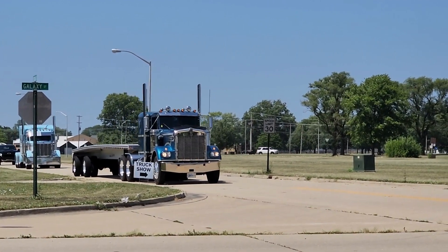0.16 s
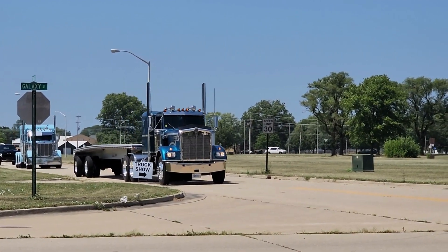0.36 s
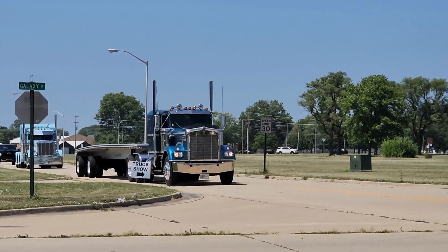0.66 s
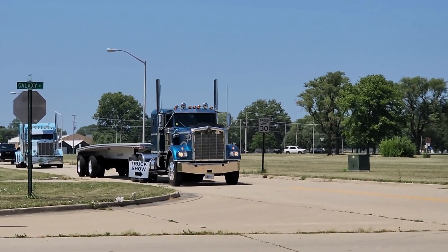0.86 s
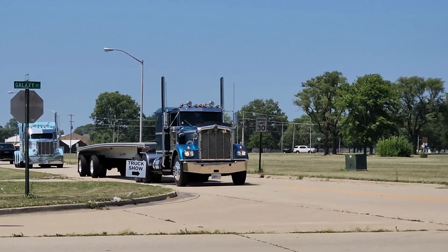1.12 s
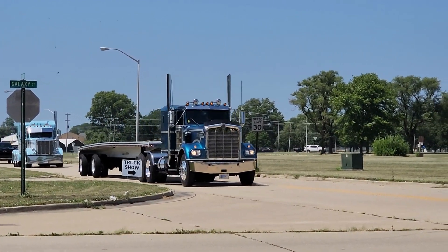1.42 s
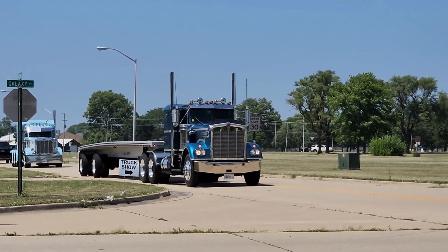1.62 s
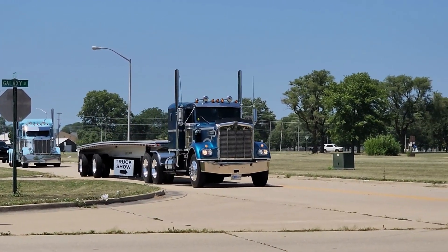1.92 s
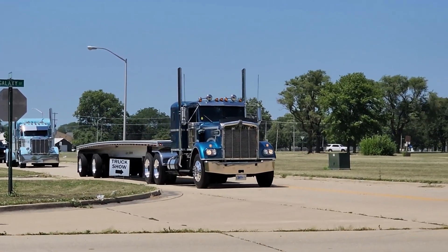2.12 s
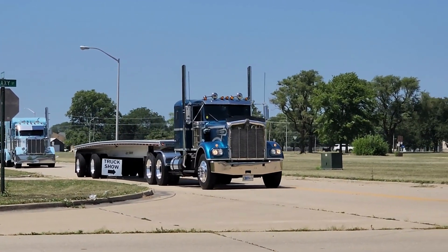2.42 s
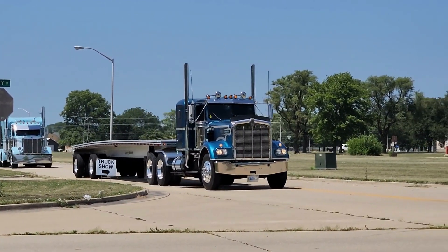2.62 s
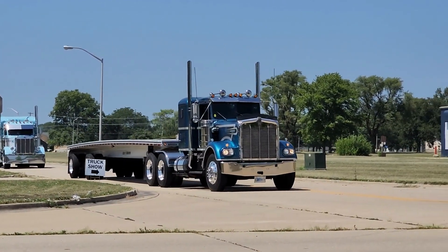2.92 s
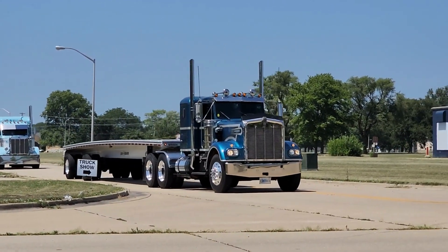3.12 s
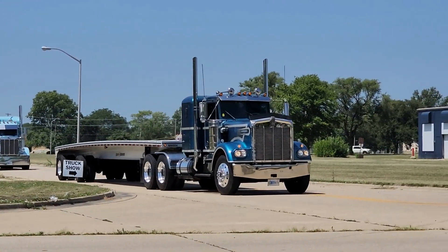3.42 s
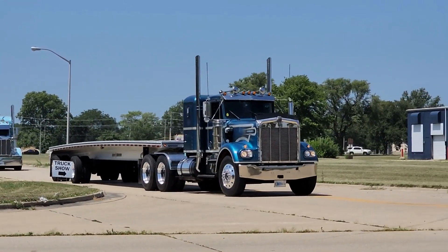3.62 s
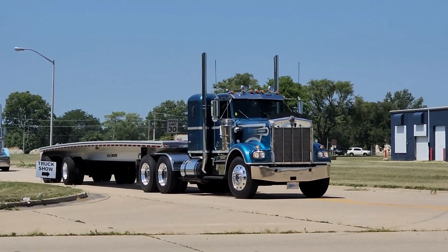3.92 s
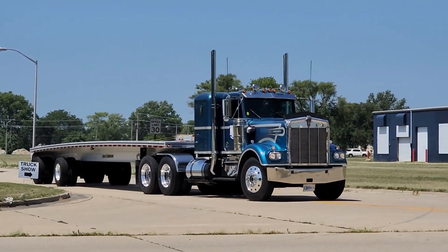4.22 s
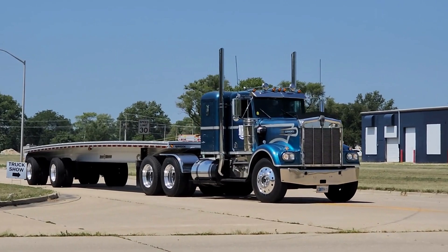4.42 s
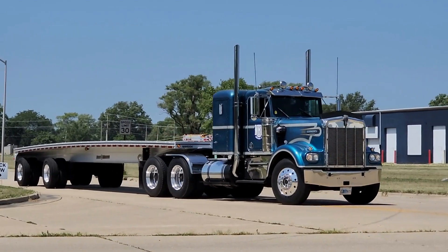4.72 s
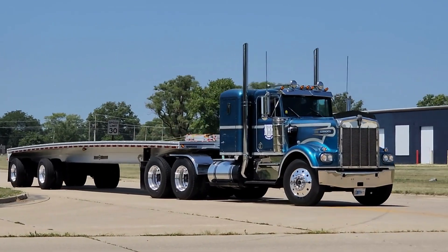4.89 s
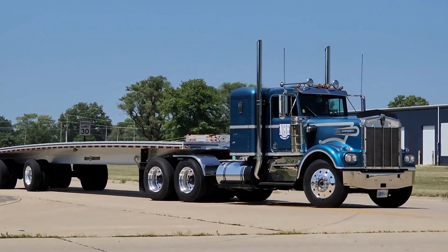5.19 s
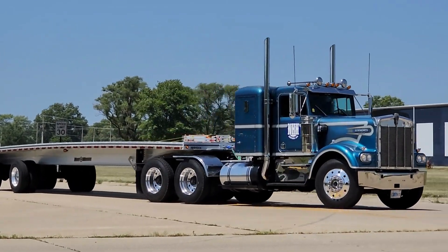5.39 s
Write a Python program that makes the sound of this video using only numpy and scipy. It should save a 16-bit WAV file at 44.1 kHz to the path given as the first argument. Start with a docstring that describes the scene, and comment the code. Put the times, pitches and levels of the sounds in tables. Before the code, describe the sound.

Heavy diesel trucks drone at low speed as one clatters nearer and pulls on, its belt chirping, with wind buffeting the microphone.

```python
"""A street corner, where a queue of six-cylinder diesel trucks creeps towards a small stereo microphone.
One engine slows with a strong exhaust drone. The near one clatters just above idle, its exhaust
beating against that drone, and a third idles behind. A belt chirps, loose chassis steel ticks,
brake air hisses and wind buffets the microphone ports."""
import sys
import numpy as np
from scipy import signal
from scipy.fft import rfft, irfft, next_fast_len
from scipy.io import wavfile
from scipy.ndimage import uniform_filter1d, map_coordinates

SR = 44100
rng = np.random.default_rng(int(sys.argv[2]) if len(sys.argv) > 2 else 0)


def store_wav(level_fs):
    """Save 16-bit WAV to argv[1]."""
    pcm = np.round(np.clip(np.atleast_2d(level_fs), -1, 1) * 32767)
    wavfile.write(sys.argv[1], SR, pcm.T.astype(np.int16))


N = 244755
T = np.arange(N) / SR
APPROACH_DB = 1.0766 * T  # the near truck rolls closer
IDLE_HZ, PULL_S = 34.43, 3.964  # its idle firing rate, and when it pulls away

# Crank positions at the start, in firing cycles: drone engine, near engine.
START_CYCLES = (-.206, .23)
# The drone engine slowing. Each row: time in seconds, firing rate in Hz.
DRONE_FIRING = [(0, 74.3), (.793, 74.28), (1.189, 73.83), (1.586, 71.22), (1.982, 72), (2.379, 70.63),
                (2.775, 69.89), (3.171, 69.9), (3.568, 68.26), (3.964, 67.57), (5.55, 63.41)]
# The drone's fader. Each row: time in seconds, level in dB.
DRONE_FADER = [(0, -5.5), (1, -6), (1.37, -4.5), (1.45, -9), (1.6, -11), (1.8, -7.5), (2.02, -11),
               (2.1, -9.5), (2.35, -11), (2.43, -7.5), (2.54, -11), (2.585, -21), (2.63, -13), (2.78, -12),
               (2.84, -6), (2.87, -9), (2.92, -6), (2.98, -12), (3.04, -6), (3.11, -7), (3.16, -15),
               (3.21, -9), (3.38, -16), (3.45, -13), (4, -15), (4.25, -17), (4.45, -16), (4.8, -15.5),
               (5.55, -15.9)]
# Exhaust partials as multiples of the firing rate, lead partial first. Rows: drone engine, near engine.
EXHAUST_ORDERS = [(1, 2, 3, 3 / 2, 5 / 3, 8 / 3), (2, 1, 3, 4, 5)]
# The drone's weaker partials. Each row: one partial's dB against the lead, evenly spaced in time.
DRONE_PARTIALS = [(-19, -17, -17.5, -21.5, -19, -21.5, -11, -8.5, -4),
                  (-47.5, -47, -44.5, -46, -36, -29, -14.5, -17.5, -21), (-36.5, -33, -18.5, -13),
                  (-33.5, -28, -29.5, -36.5), (-32, -38, -59, -28)]
def drone_exhaust():
    """Firing pulses in the pipe make a deep drone that sinks as the engine slows."""
    firing_hz, = curves(DRONE_FIRING)
    level_db, = curves(DRONE_FADER)
    cycles = START_CYCLES[0] + np.cumsum(firing_hz) / SR
    return amp(level_db) * pipe(cycles, EXHAUST_ORDERS[0], DRONE_PARTIALS)


# The near pipe's weaker partials. Each row: one partial's dB against the lead, evenly spaced in time.
NEAR_PARTIALS = [(-4, -12.5, -8.5, -12.5), (-6.5, -5.5, -18, -25),
                 (-25, -19, -13.5, -10, -13.5, -6.5, -8.5, -7.5, -17), (-20.5, -29.5, -19, -20)]
def near_exhaust(cycles):
    """The near pipe's second order beats against the drone and swells under load."""
    load_db = 6.5 * np.clip((T - PULL_S) / .3, 0, 1)
    return amp(-30.5 + 1.25 * APPROACH_DB + load_db) * pipe(cycles, EXHAUST_ORDERS[1], NEAR_PARTIALS)


# Accents of the three firings in one crank turn, in dB.
CYLINDER_DB = [2.5, .5, -1.5]
# The engine bay swinging towards us. Each row: time in seconds, knock level in dB.
BAY_FADER = [(0, -36), (.45, -39.5), (1.1, -35), (1.5, -37.5), (3.1, -30), (4.7, -31), (5.1, -32),
             (5.35, -30.5), (5.47, -30), (5.55, -29)]
# The engine block's resonances. Each row: pitch in Hz, width in Hz, level in dB.
BLOCK_MODES = [(1335, 141, 5), (1605, 126, 8.5), (1777, 166, 7.5), (2122, 304, 3.5), (3250, 60, -22)]
def near_engine():
    """Uneven firings knock the block and set the rhythm for every part of the near engine."""
    firing_hz = IDLE_HZ + 3.4 * (1 - np.exp(-np.maximum(T - PULL_S, 0) / 2.127))
    cycles = START_CYCLES[1] + np.cumsum(firing_hz) / SR
    firing = np.floor(cycles - .7).astype(int)
    scatter_db = .8 * rng.standard_normal(N // 1000)[firing + 1]
    strength = amp(np.array(CYLINDER_DB)[firing % 3] + scatter_db)
    blows = np.diff(firing, prepend=firing[0]) * strength
    knock = strength * burst(cycles, delay=.7, life=.33)
    bay_db, = curves(BAY_FADER)
    clatter = amp(bay_db + .4 * wobble(7)) * stereo_noise(modes(BLOCK_MODES), .7 + knock)
    metal = clatter + valve_gear(cycles) + valve_cover(blows, knock)
    throb = 1 + .35 * knock
    return near_exhaust(cycles) + metal + roar(throb) + cooling_air(bay_db, throb) + belt(cycles)


# Tappet hits. Each row: firings between hits, offset in firings, pitch in Hz, t60 in seconds.
TAPPET_HITS = [(3, .95, 1620, .045), (3, 1.6, 1580, .04), (1, .7, 1370, .035), (1, .76, 1880, .05)]
# Their faders. Each row: one tappet's level in dB, evenly spaced in time.
TAPPET_FADERS = [(-39, -36, -31, -27, -24, -24, -19, -24, -25),
                 (-41, -37, -31, -24, -25, -29, -32, -23.5, -25.5),
                 (-48, -46, -44, -42, -39, -35, -31, -31, -31),
                 (-43, -38, -33, -30, -29, -33, -42, -44, -44)]
def valve_gear(cycles):
    """Sharp metal knocks tied to the crank; each differs a little in weight, pitch and timing."""
    out = np.zeros((2, N + SR // 20))
    for (every, offset, hz, t60), fader in zip(TAPPET_HITS, TAPPET_FADERS):
        hits = np.flatnonzero(np.diff(np.floor((cycles - offset) / every)))
        lead = np.exp(.5j * along(LEFT_LEAD, hz) * np.array([[1], [-1]]))
        for at, db in zip(hits, ride(fader)[hits]):
            weight, detune, late_ms = rng.standard_normal(3)
            ring = amp(db + 2.2 * weight) * ping(hz * (1 + .03 * detune), t60, rise=.003)
            at += int(abs(late_ms) * SR / 1000)
            out[:, at:at + len(ring)] += (ring * lead).imag[:, :out.shape[1] - at]
    return out[:, :N]


# The valve cover's resonances. Each row: pitch in Hz, width in Hz, level in dB.
COVER_MODES = [(1900, 36, 0), (830, 45, -5), (1760, 50, -12), (1090, 60, -19), (3080, 60, -15)]
# When the cover comes through: start, rise, hold and fall in seconds.
COVER_SWELL = (0.27, 0.83, 2.1, .6)
def valve_cover(blows, knock):
    """Each firing rings the cover, which is 20 dB quieter while hidden."""
    level_db = -38.5 - 20 * (1 - swell(*COVER_SWELL))
    strikes = blows + .12 * knock * rng.standard_normal(N)
    return amp(level_db + wobble(8.4)) * unit(filtered(strikes, modes(COVER_MODES)))


# The running gear's tone. Each row: frequency in Hz, level in dB.
ROAR_EQ = [(60, -45.5), (100, -21.5), (150, -13), (240, -19), (330, -19), (450, -20.5), (640, -21.5),
           (810, -17.5), (950, -21.5), (1080, -17), (1300, -24.5), (1900, -61.5)]
def roar(throb):
    """The running gear roars in time with the firings, louder as the truck nears."""
    return amp(-35.5 + APPROACH_DB + .69 * wobble(12)) * stereo_noise(colour(ROAR_EQ), throb)


# The cooling air's tone. Each row: frequency in Hz, level in dB.
COOLING_EQ = [(2300, -24.5), (2600, -4.5), (2900, -1.5), (3100, 2.5), (3450, 1), (3800, -1), (4050, -4.5),
              (4500, -10), (7900, -27), (12000, -48.5)]
def cooling_air(bay_db, throb):
    """A bright, pulsing rush from the engine bay; brake puffs add a rasp in the same band."""
    _, rasp, _ = air_flow()
    return (amp(bay_db - 11.5) + rasp) * amp(1.1 * wobble(9.3)) * stereo_noise(colour(COOLING_EQ), throb)


# The third engine. Each row: multiple of the firing rate, then levels in dB evenly spaced in time.
IDLE_PARTIALS = [(2, -40, -38, -33, -32, -34, -38, -40), (3, -40, -30, -28, -28, -28, -33, -40),
                 (4, -35, -34, -32, -24, -29, -33, -37)]
def idling_exhaust(firing_hz=20.04):
    """The truck behind hums at a steady pitch, its partials wavering in level."""
    cycles = .265 + firing_hz * T
    return spread(sum(amp(ride(fader) + wobble(1.7)) * np.exp(2j * np.pi * order * cycles)
                      for order, *fader in IDLE_PARTIALS))


# The drone engine's fan. Each row: time in seconds, blade tone in Hz, its level in dB, its octave's in dB.
FAN_TONES = [(0, 249, -36.5, -47), (1.2, 247.3, -35.5, -47), (1.6, 238.6, -35, -46.5),
             (2, 241.2, -33.5, -46.5), (2.4, 236.6, -34, -48), (3.2, 234.2, -34.5, -50.5),
             (3.7, 230.5, -34, -47), (4.06, 226.5, -35, -43), (4.45, 223.8, -36, -39.5),
             (4.9, 219, -42, -39.5), (5.2, 216, -50, -40), (5.55, 215.5, -45, -40)]
def fan():
    """Passing blades make a slightly unsteady tone and its octave."""
    blade_hz, *levels = curves(FAN_TONES)
    phase = 2 * np.pi * np.cumsum(blade_hz) / SR
    return sum(np.sqrt(2) * amp(db + 1.3 * wobble(9)) * np.cos(k * phase + .4 * wobble(18))
               for k, db in enumerate(levels, 1))


# When the belt slips: start, rise, hold and fall in seconds.
BELT_SWELL = (3.3, .65, 1.2, .2)
def belt(cycles):
    """The belt slips at each torque pulse: a rough squeak that drops in pitch."""
    elapsed = T - BELT_SWELL[0]
    slip = burst(cycles + .02 * wobble(30), delay=.4, life=.2) * amp(1.2 * wobble(30))
    centre_hz = np.minimum(2110 + 115 * elapsed, 2320)
    glide_hz = centre_hz - 105 * np.tanh(((cycles - .4) % 1 - .27) / .08)
    jitter = .32 * np.cumsum([wobble(60), wobble(130)], axis=0)  # left, right
    squeak = unit(slip * np.cos(2 * np.pi * np.cumsum(glide_hz) / SR + jitter))
    rough = stereo_noise(modes([(2294, 130, 0), (2690, 130, -9)]), .2 + slip)
    return swell(*BELT_SWELL) * amp(-38.5 + 4 * elapsed) * unit(squeak + .6 * rough)


# Chassis ticks. Each row: start in seconds, level in dB, ring pitch in Hz, low click's trim in dB.
TICK_CUES = [(2.7576, -47, 10800, -1.5), (2.8958, -45.5, 10860, -6.5), (2.9841, -49.5, 10400, -7.5),
             (3.0694, -49.5, 11600, -6.5), (3.1283, -39, 10700, -12), (3.184, -45, 10200, -9),
             (3.242, -39.5, 10700, -7), (3.2829, -44, 10700, -8.5), (3.3243, -43.5, 10800, -9.5),
             (3.3463, -47, 10200, -8), (3.545, -40.5, 10800, -7), (3.6802, -40.5, 10570, -8.5),
             (3.7708, -42.5, 10700, -7), (3.9646, -34, 10500, -8.5), (4.005, -41, 11400, -9.5),
             (4.0652, -38.5, 10800, -11), (4.117, -30, 10800, -5.5), (4.1348, -43, 11500, -9),
             (4.1612, -37.5, 10800, -11.5), (4.3138, -28, 10600, -9.5), (4.3413, -43, 11300, -12),
             (4.367, -38.5, 10800, -16.5), (4.3934, -44.5, 10800, -2.5), (4.431, -33, 10900, -14),
             (4.5148, -33.5, 11100, -4.5), (4.5972, -45.5, 10800, -9), (4.6553, -35, 11400, -9.5),
             (4.7202, -42, 11300, 0), (4.7667, -31, 11300, -16.5), (4.818, -35, 11000, -10),
             (4.8563, -29.5, 13640, -13.5), (4.8788, -40, 11500, -13.5), (4.9028, -39.5, 12100, -14),
             (4.944, -37, 13550, -12.5), (5.029, -25, 11500, -10), (5.0669, -39, 11700, -8),
             (5.0854, -40, 11200, -8), (5.1071, -38, 11300, -9), (5.1617, -31.5, 11900, -2),
             (5.2425, -31.5, 10400, -9.5), (5.384, -28, 11500, -11.5), (5.3944, -35.5, 12700, -7),
             (5.4248, -35, 11600, -11.5), (5.4665, -38.5, 11500, -5), (5.4934, -36.5, 10300, -6),
             (5.5334, -30, 11400, -4)]
# Resonances of the small steel parts. Each row: pitch in Hz, width in Hz, level in dB.
STEEL_MODES = [(10750, 3200, -8), (12050, 400, -3.5), (12100, 500, -6.5), (13500, 1200, -8.5),
               (14400, 1600, -11.5)]
def chassis():
    """Loose steel ticks, each a bright scrape, a lower click and a ring; faint ticks fill in."""
    scrapes, clicks, rings = np.zeros(N), np.zeros(N), np.zeros(N + SR // 20)
    for start, db, hz, click_db in TICK_CUES:
        at = round(start * SR)
        scrapes[at] = amp(db - 10)
        clicks[at] = amp(db + click_db - 4.5)
        rings[at:at + SR // 20] += amp(db - 6) * ping(hz, t60=.022, rise=.001).imag
    when, faintness = rng.random((2, 700))
    at = (when * N).astype(int)
    _, _, sizzle = air_flow()
    scrapes[at] += sizzle[at] * amp(-.5 - 2.5 * np.log(faintness + .043))
    t = np.arange(SR // 10) / SR
    decay = amp(-60 * t / .015) + amp(-26 - 60 * t / .07)  # snap plus a quiet tail
    shape = (1 - np.exp(-t / .0025)) * decay
    scrapes, clicks = signal.fftconvolve([scrapes, clicks], shape[None] / shape.max(), axes=1)[:, :N]
    noise = rng.standard_normal((2, N)) + .38 * rng.standard_normal((2, 2, N))
    # small parts carry little below their rings
    thin = keep_power(lambda f: modes(STEEL_MODES)(f) / (1 + (9900 / (f + 1)) ** 14))
    low = keep_power(modes([(4720, 430, 2), (7330, 5200, -7)]))
    return rings[:N] + filtered(scrapes * noise[:, 0], thin) + filtered(clicks * noise[:, 1], low)


# Brake puffs. Each row: start, rise, hold and fall in seconds, hiss level in dB, rasp level in dB.
PUFF_CUES = [(0, 0.013, 0.091, 0.45, -62, -66), (.58, 0.49, .08, 0.78, -54, -48.5),
             (1.289, 0.33, 0.51, .3, -66.5, -61), (2.06, 0.49, 0.092, 0.18, -57.5, -53.5),
             (3.615, 0.33, 0.89, 0.28, -62.5, -77), (4.628, 0.48, 0.4, 0.074, -55.5, -85)]
def air_flow():
    """Gains of the brake hiss, the rasp below it and the sizzle above: puffs over a steady bleed."""
    hiss, rasp = sum(swell(*shape) ** 2 * amp([[db], [rasp_db]]) for *shape, db, rasp_db in PUFF_CUES)
    bleed = amp(-64 + .21 * APPROACH_DB)
    sizzle = amp(-82.5 + 3.33 * APPROACH_DB) + amp(-17.5) * hiss
    return bleed + hiss, rasp, sizzle


# The brake hiss's tone. Each row: frequency in Hz, level in dB.
LEAK_EQ = [(4300, -30), (4800, -8), (5200, -5), (5450, 1), (5750, -6), (6500, -4), (7800, -9), (9500, -30)]
def brake_air():
    """Air bleeds from the brake lines, with a finer sizzle on top."""
    hiss, _, sizzle = air_flow()
    leak = hiss * amp(1.1 * wobble(17)) * stereo_noise(colour(LEAK_EQ))
    return leak + sizzle * amp(1.2 * wobble(16)) * stereo_noise(modes(STEEL_MODES))


# The wind's rumble. Each row: frequency in Hz, level in dB.
WIND_EQ = [(15, -26), (35, -6), (55, -5), (90, 0), (125, -2), (200, -11), (300, -22), (400, -35),
           (600, -50)]
# Gusts. Each row: start, rise, hold and fall in seconds, level in dB.
GUST_CUES = [(1.617, 0.2, 0.46, 0.082, -30), (2.097, 0.085, 0.367, 0.098, -22),
             (2.687, 0.15, 0.36, 0.13, -23), (3.2, 0.079, 0.55, 0.56, -42), (5.09, 0.16, 0.2, .1, -25)]
def wind():
    """Lumpy pressure, partly shared by the two ports; gusts are rougher than the breeze above 250 Hz."""
    lumps = amp(1.8 * np.array([wobble(15) for _ in range(3)]))
    shared, left, right = filtered(lumps * rng.standard_normal((3, N)), colour(WIND_EQ))
    breeze = unit(np.array([shared + .56 * left, shared + .54 * right]))
    rough = unit(filtered(breeze, lambda f: 1 + (f / 250) ** 2))
    return amp(-25.5) * breeze + sum(amp(db) * swell(*shape) for *shape, db in GUST_CUES) * rough


def pipe(cycles, orders, faders):
    """An exhaust tone: a lead partial and weaker ones that waver."""
    tone = np.exp(2j * np.pi * orders[0] * cycles)
    for order, fader in zip(orders[1:], faders):
        polarity = -1 if order == 4 else 1  # the near pipe turns its fourth order over
        tone += polarity * amp(ride(fader) + .9 * wobble(5)) * np.exp(2j * np.pi * order * cycles)
    return spread(tone)


def spread(tone):
    """A complex tone in stereo, a touch louder and earlier on the left."""
    side = np.array([[1], [-1]])
    return -np.sqrt(2) * (tone * amp(.35 * side) * np.exp(.1j * side)).real


# Stereo width. Each row: frequency in Hz, left-right likeness from 0 to 1.
LIKENESS = [(60, .95), (500, .88), (1000, .8), (2000, .7), (3200, .45), (6000, .3), (9000, .8)]
# Stereo placement. Each row: frequency in Hz, the left port's phase lead in radians.
LEFT_LEAD = [(700, 0), (1200, .4), (2300, .8), (3000, 1.4), (4500, .8), (9000, 0)]
def stereo_noise(response, gate=1):
    """Gated noise through a response, partly alike at the two ports, rms 1."""
    size = next_fast_len(N + SR // 10)
    hz = np.fft.rfftfreq(size, 1 / SR)
    alike = np.clip(along(LIKENESS, hz), 0, 1)
    lead = np.exp(.5j * along(LEFT_LEAD, hz))
    mid, side = rfft(gate * patchy(depth_db=1.9), size) * response(hz) * np.sqrt([1 + alike, 1 - alike])
    return unit(irfft([mid * lead + side, mid / lead - side], size)[:, :N])


def patchy(depth_db):
    """Two noises whose gain varies in small patches of time and frequency."""
    spectra = signal.stft(rng.standard_normal((2, N)), nperseg=512)[2]
    patches = uniform_filter1d(rng.standard_normal(spectra.shape[1:]), size=2, axis=0)
    patches = uniform_filter1d(patches, size=8, axis=1)
    return signal.istft(spectra * amp(depth_db * unit(patches)), nperseg=512)[1][:, :N]


def burst(cycles, delay, life):
    """A quick rise and decay once per cycle; delay and life in cycles."""
    age = (cycles - delay) % 1 / life
    return age * np.exp(1 - age)


def ping(hz, t60, rise):
    """A short damped ring, as a complex tone."""
    t = np.arange(SR // 20) / SR
    return (1 - np.exp(-t / rise)) * amp(-60 * t / t60) * np.exp(2j * np.pi * hz * t)


def swell(start, rise, hold, fall):
    """A fade from 0 to 1 and back."""
    return np.interp(T, start + np.cumsum([0, rise, hold, fall]), [0, 1, 1, 0])


def ride(fader):
    """A fader move through values evenly spaced over the scene."""
    return np.interp(T, np.linspace(0, T[-1], len(fader)), fader)


def curves(rows):
    """One value per sample for each column after the time."""
    times, *columns = np.transpose(rows)
    return [np.interp(T, times, column) for column in columns]


def wobble(rate):
    """A smooth random curve, rate knots a second."""
    coarse = T[::128]
    knots = rng.standard_normal(int(N * rate / SR) + 4)
    return np.interp(T, coarse, map_coordinates(knots, [coarse * rate]))


def filtered(x, response):
    """x through a complex frequency response."""
    size = next_fast_len(N + SR // 4)
    return irfft(rfft(x, size) * response(np.fft.rfftfreq(size, 1 / SR)), size)[..., :N]


def modes(table):
    """The response of a set of resonances, alternating in polarity."""
    return lambda f: sum((-1) ** k * amp(db) * 1j * f * width / (hz * hz - f * f + 1j * f * width)
                         for k, (hz, width, db) in enumerate(table))


def colour(eq):
    """The response of an EQ curve, shut beyond its ends."""
    return lambda hz: amp(along(eq, hz, outside=-120))


def keep_power(response):
    """A response scaled to keep the power of white noise."""
    return lambda f: response(f) / np.sqrt(np.mean(np.abs(response(f)) ** 2))


def along(points, hz, outside=None):
    """Read (Hz, value) points on a log axis."""
    freqs, values = np.transpose(points)
    return np.interp(np.log(hz + 1), np.log(freqs + 1), values, outside, outside)


def amp(db):
    """Decibels to gain."""
    return 10 ** (np.asarray(db) / 20)


def unit(x):
    """x at rms 1."""
    return x / np.sqrt(np.mean(x ** 2) + 1e-20)


def scene():
    """All sources at the two ports."""
    return drone_exhaust() + near_engine() + idling_exhaust() + fan() + chassis() + brake_air() + wind()


# Hollows of the microphone housing. Each row: centre in Hz, width in Hz, depth from 0 to 1.
HOUSING_DIPS = [(935, 110, .62), (1250, 130, .48)]
def record(dry):
    """The housing scoops two narrow bands, the input saturates near full scale, the very top is cut."""
    housing = lambda f: 1 - sum(depth * modes([(hz, width, 0)])(f) for hz, width, depth in HOUSING_DIPS)
    heard = filtered(dry, housing)
    saturated = heard / (1 + np.abs(heard / .95) ** 8) ** (1 / 8)
    return filtered(saturated, lambda hz: hz < 15810)


dry = scene()
out = record(dry)
store_wav(out)
```